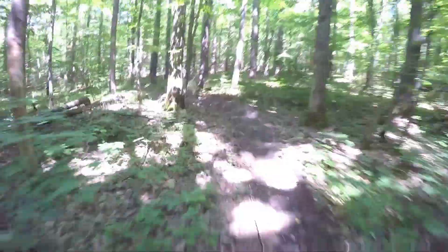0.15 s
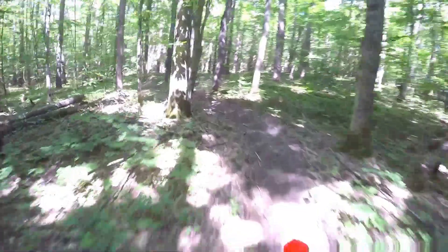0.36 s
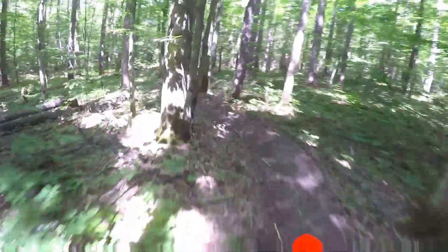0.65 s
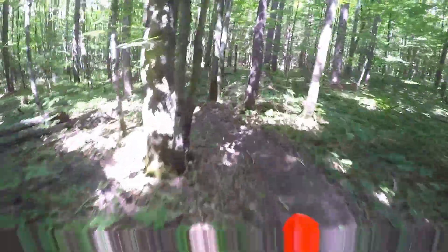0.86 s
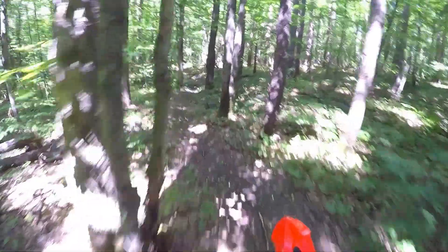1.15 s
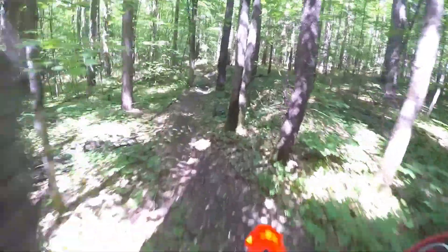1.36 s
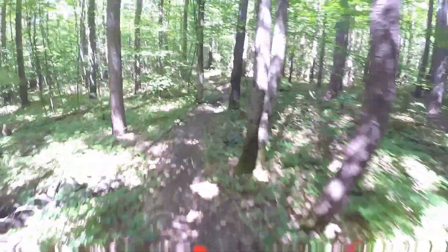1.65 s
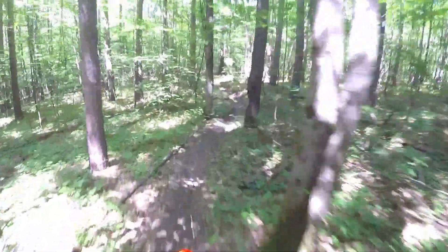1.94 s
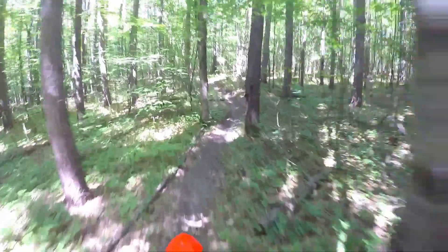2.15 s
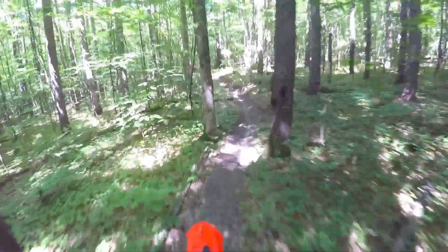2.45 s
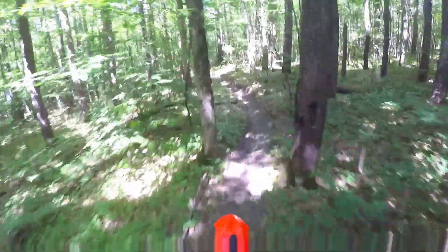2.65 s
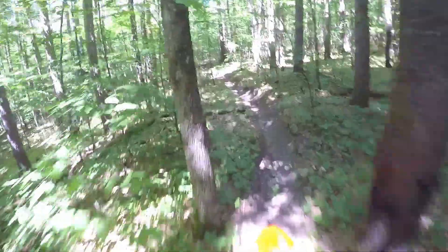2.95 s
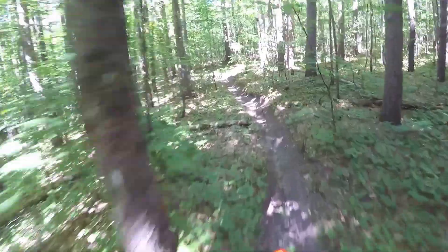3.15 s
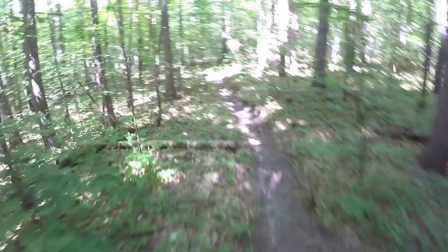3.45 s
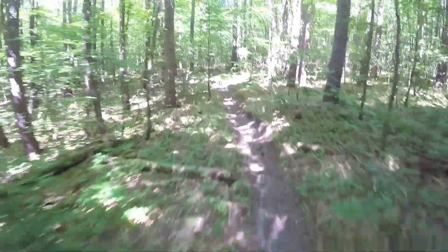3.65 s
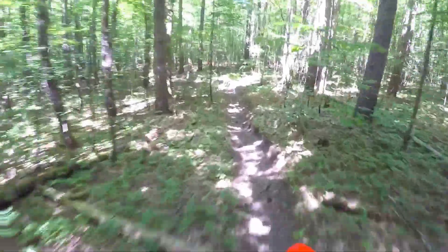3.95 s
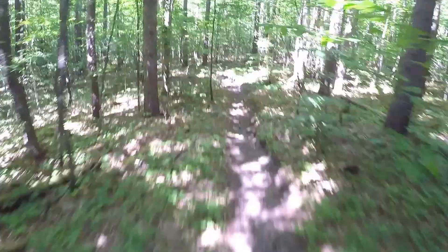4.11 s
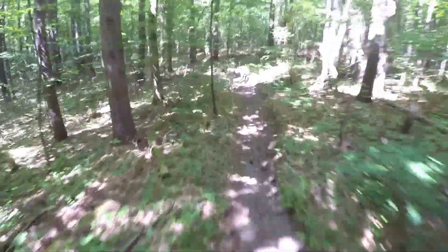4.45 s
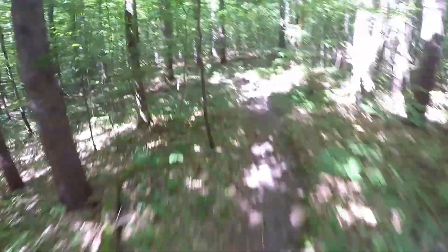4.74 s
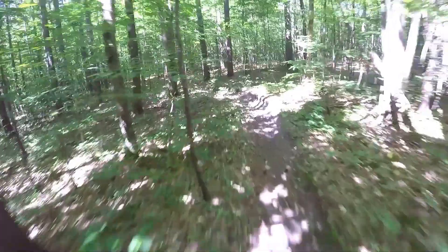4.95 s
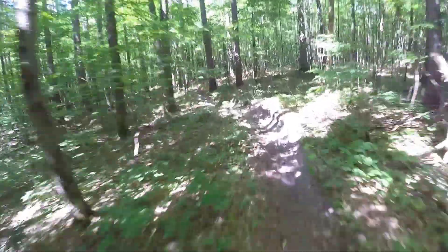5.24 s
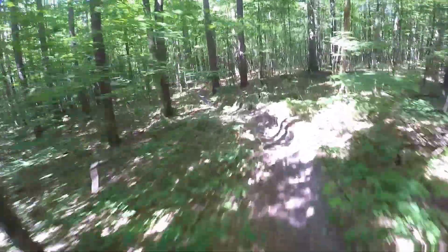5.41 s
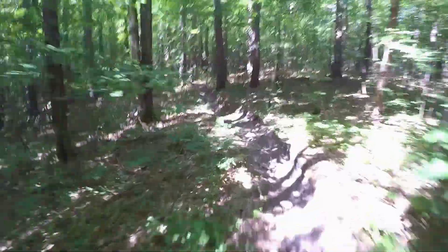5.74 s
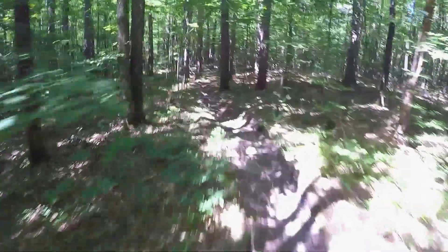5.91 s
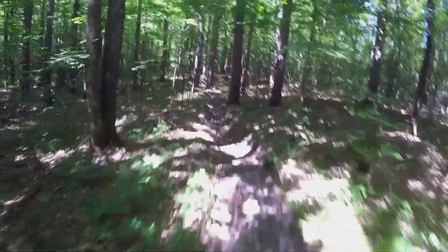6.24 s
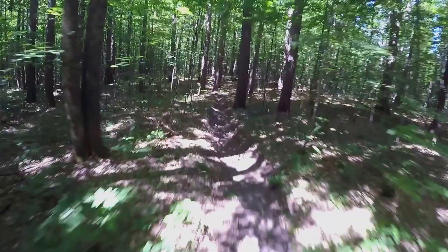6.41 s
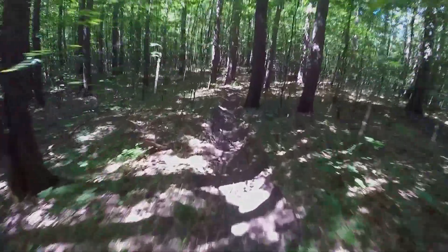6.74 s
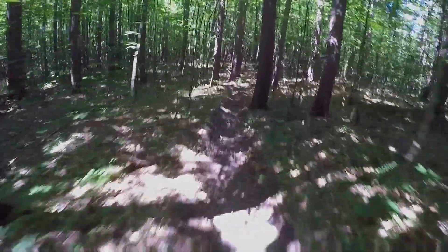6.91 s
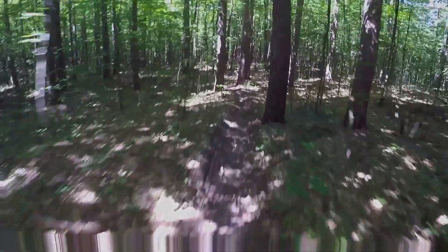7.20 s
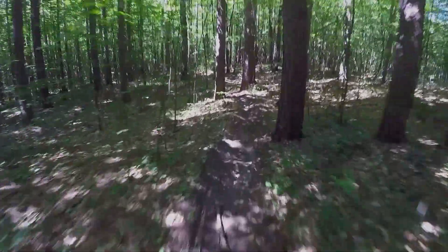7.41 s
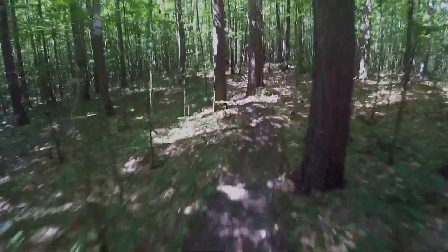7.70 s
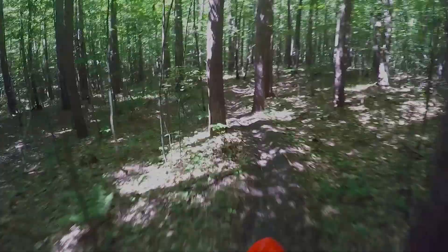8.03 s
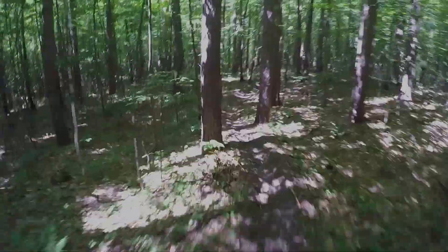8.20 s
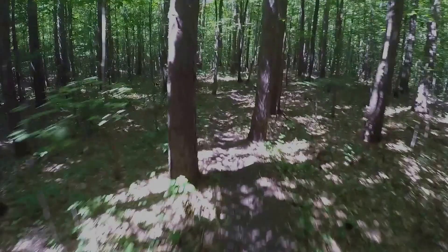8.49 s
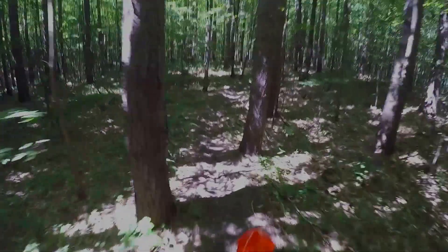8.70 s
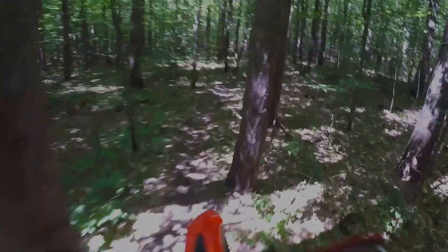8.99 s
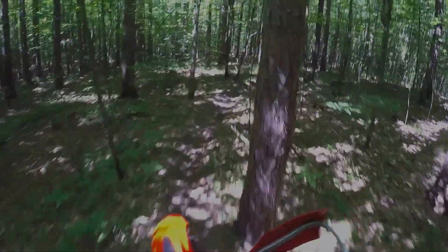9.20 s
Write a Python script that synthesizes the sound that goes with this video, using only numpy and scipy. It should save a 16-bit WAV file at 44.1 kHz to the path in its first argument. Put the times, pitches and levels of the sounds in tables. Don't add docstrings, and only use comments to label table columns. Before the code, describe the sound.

Heard from a camera on the rider's helmet outdoors: tyre rumble, lumpy wind buffeting and a fast low engine hum that wavers over bumps. The two-stroke burbles, then fires in three ringing bursts in the first half, the second and third loudest. Off throttle it purrs, clatters and pops irregularly. Later, hard little ticks and swishing foliage strike the casing before the engine slows.

```python
import sys
import numpy as np
from scipy import signal
from scipy.fft import rfft, irfft, next_fast_len
from scipy.io import wavfile
from scipy.ndimage import uniform_filter1d, map_coordinates

SR = 44100
rng = np.random.default_rng(int(sys.argv[2]) if len(sys.argv) > 2 else 0)


def makeup_ratio(level_db):
    decades = np.asarray(level_db, float) / 20
    return 10 ** decades


def transcribe(signal):
    frames = np.atleast_2d(signal).T
    limited = np.clip(frames, -1, 1)
    pcm = np.round(limited * 32767).astype(np.int16)
    wavfile.write(sys.argv[1], SR, pcm)


N = 412776
T = np.arange(N) / SR

# time in seconds, firings in Hz, exhaust level in dB, pipe note in Hz.
BURSTS = [
    [(1.625, 37.8, -19, 273), (1.655, 39.25, -18.5, 286), (1.791, 42.75, -17, 283),
     (1.937, 45.03, -18, 299), (1.991, 47.4, -20, 310), (2.021, 47.32, -29.5, 307), (2.1, 44.3, -30.5, 288)],
    [(3.196, 41.6, -15.5, 269), (3.258, 43, -16.5, 284), (3.364, 45.38, -13, 294.5),
     (3.48, 52.1, -11.5, 283), (3.554, 52.3, -12.5, 280.3), (3.612, 52.73, -13, 287),
     (3.682, 57.53, -10.5, 291), (3.725, 58.4, -22, 286)],
    [(4.5055, 54.6, -14, 304), (4.53, 55.35, -11, 309.4), (4.572, 56.5, -11, 308),
     (4.63, 54.53, -16, 309.8), (4.684, 56.4, -13, 295.5), (4.715, 56.3, -21, 279.7)],
]


def unit(x):
    return x / np.sqrt(np.mean(x ** 2) + 1e-20)


def curves(rows):
    s, *cols = np.transpose(rows)
    return [np.interp(T, s, c) for c in cols]


def along(points, hz):
    f, db = np.transpose(points)
    return np.interp(np.log(hz + 1), np.log(f), db)


def humps(rows):
    return sum(height * np.exp(-((T - s) / half) ** 2) for s, height, half in rows)


def wobble(rate, times=T):
    return map_coordinates(rng.standard_normal(int(N * rate / SR) + 4), [times * rate])


def follows(strain_db, load, base_db, slope, load_db, power):
    return makeup_ratio(base_db + slope * (strain_db + 46.5)) + makeup_ratio(load_db) * load ** power


def filtered(x, response):
    m = next_fast_len(N + SR // 2)
    return irfft(rfft(x, m) * response(np.fft.rfftfreq(m, 1 / SR)), m)[:N]


def mode(f, hz, width, db):
    return makeup_ratio(db) * 1j * f * width / (hz * hz - f * f + 1j * f * width)


def in_row(x, modes):
    response = lambda f: np.prod([mode(f, *m) for m in modes], axis=0)
    return filtered(x, response) / np.max(np.abs(filtered(T == 0, response)))


def side_by_side(x, modes):
    return filtered(x, lambda f: sum((-1) ** k * mode(f, *m) for k, m in enumerate(modes)))


def patchy(depth_db):
    z = signal.stft(rng.standard_normal(N), nperseg=512)[2]
    field = uniform_filter1d(rng.standard_normal(z.shape), size=3, axis=0)
    field = uniform_filter1d(field, size=7, axis=1)
    return unit(signal.istft(z * makeup_ratio(depth_db * unit(field)), nperseg=512)[1][:N])


def noise(spectrum, depth_db):
    return unit(filtered(patchy(depth_db), lambda hz: makeup_ratio(along(spectrum, hz))))


def firings(speed, start, stop, jitter):
    a, b = round(start * SR), min(round(stop * SR), N)
    turn_count = np.floor(np.cumsum(speed[a:b]) / SR)
    at = a + np.flatnonzero(np.diff(turn_count, prepend=-1))
    late = np.round(jitter * SR * rng.standard_normal(len(at))).astype(int)
    return np.clip(at + late, 0, N - 1)


def add(out, at, size, hz, rise):
    t = np.arange(SR // 16) / SR
    rise = 1.22 * np.clip(rise, .001, .012)
    u = t / rise[:, None]
    swell = (u * np.exp(1 - u)) ** 3
    wave = -size[:, None] * swell * np.sin(2 * np.pi * hz[:, None] * (t - rise[:, None]))
    start = at + np.round((.004 - rise) * SR).astype(int)
    out += np.bincount((start[:, None] + np.arange(len(t))).ravel(), wave.ravel(), N + SR)[:N]


def crank(turns, hum_db, load):
    # time in seconds, loss in dB, half
    # length in seconds.
    hum_dips = [(0, 25, 0.13), (1.82, 16, 0.053), (2.02, 26, 0.094), (3.06, 8, 0.032), (3.55, 6, 0.095),
                (4.25, 6.5, 0.11), (4.82, 16, 0.067), (5.16, 11, 0.035), (5.37, 10, 0.044), (5.93, 39, 0.052),
                (6.24, 20, 0.064), (6.96, 8, 0.06), (7.51, 4.5, 0.17), (8.29, 22, 0.054), (8.6, 7, 0.047)]
    # multiple of the turn rate, level in dB.
    loaded_orders = [(2, -21), (3, -38), (4, -32), (5, -27.5)]
    hum_db = hum_db - humps(hum_dips)
    first = makeup_ratio(hum_db + 1.8 * wobble(14)) * np.sin(2 * np.pi * turns + .4 * wobble(9))
    more = sum(makeup_ratio(db + 1.4 * wobble(11)) * np.sin(2 * np.pi * round(k) * turns + 0.58 * wobble(8))
               for k, db in loaded_orders)
    return np.sqrt(2) * (first + load ** .6 * more)


def coasting(speed, turns):
    # time in seconds, level in dB, extra brightness in dB per octave over the pipe note.
    pumping = [(0, -25, 1), (.3, -30, -0.5), (.55, -29.5, -0.5), (.94, -27.5, -5), (1.4, -31, 2),
               (2.27, -31, -1), (3.05, -29.5, 1.5), (4.04, -28.5, 0), (4.9, -30, 1.5), (5.4, -32, 4.5),
               (5.9, -30, 2.5), (6.39, -30.5, 3), (6.8, -30, 2), (7.51, -33, -2.5), (8.1, -34, 0.5),
               (8.45, -30, -14), (8.9, -33.5, -6), (9.36, -34.5, -13)]
    # frequency in Hz, level in dB.
    cool_pipe = [(90, 3.5), (150, -8.5), (290, 0), (370, -5), (440, -18), (510, -2), (590, -8), (800, -30)]
    coast_db, tilt = curves(pumping)
    step = slice(None, None, 16)
    speed, turns, times = speed[step], turns[step], T[step]
    brightness = 0.59 * (speed - 50) + tilt[step]
    purr = np.zeros(len(times))
    for k in range(2, 19):
        octaves = np.log2(np.maximum(k * speed / 270, 1))
        level_db = along(cool_pipe, k * speed) + brightness * octaves + 2.6 * wobble(10, times)
        drift = (.24 + .04 * k) * wobble(10, times) + .027 * k * wobble(32, times)
        purr += makeup_ratio(level_db) * np.sin(2 * np.pi * k * turns + drift + rng.uniform(0, 2.5))
    purr = signal.resample_poly(purr, 16, 1)[:N]
    return makeup_ratio(coast_db + 1.55 * wobble(6) - 6.0) * unit(purr)


def clatter(speed, turns, strain_db, shake, blows):
    # frequency in Hz, width in Hz, level in dB.
    low_case = [(949, 83, 1), (1314, 165, -6.5), (1650, 240, -16.5)]
    thin_walls = [(2436, 195, 2.5), (2746, 249, 1), (3896, 280, -12.5), (4650, 510, -15), (5540, 790, -19),
                  (6570, 140, -21.5), (8040, 380, -22.5)]
    low_gain = follows(strain_db, shake, base_db=-47, slope=0.72, load_db=-24, power=2) + makeup_ratio(-42) * blows
    high_gain = follows(strain_db, shake, base_db=-48, slope=0.26, load_db=-42.5, power=0.67)
    high_gain = high_gain + makeup_ratio(-35.5) * blows
    slaps = np.zeros(N)
    at = firings(speed, .008, N / SR, jitter=.00012)
    slaps[at] = makeup_ratio(1.7 * rng.standard_normal(len(at)))
    slaps = unit(slaps)
    beat = 1 + .2 * np.cos(2 * np.pi * turns - 2.4)
    gear_level = beat * makeup_ratio(.9 * wobble(60) + .6 * wobble(7))
    low = side_by_side(gear_level * patchy(depth_db=.8) + .5 * slaps, low_case)
    high = side_by_side(gear_level * patchy(depth_db=.9) + .22 * slaps, thin_walls)
    return makeup_ratio(0.5) * (low_gain * unit(low) + high_gain * unit(high))


def wind(strain_db, load):
    # time in seconds, peak in dB, half length in seconds.
    gust_times = [(0, -28, 0.29), (1.795, -19.5, 0.1), (2.436, -34, 0.08), (3.022, -24, 0.088),
                  (3.358, -34, 0.17), (3.784, -30, 0.092), (4.173, -23, 0.037), (4.389, -23.5, 0.15),
                  (4.732, -16, 0.075), (4.812, -32, 0.034), (5.058, -36, 0.1405), (5.816, -31, 0.082),
                  (6.162, -25, 0.045), (6.41, -23, 0.096), (7.08, -31, 0.07), (7.46, -31, 0.061),
                  (7.694, -29.5, .15), (8.49, -20, 0.064), (9.36, -36, .15)]
    # frequency in Hz, level in dB per Hz.
    gust_colour = [(8, -25), (16, -1), (30, -1), (40, -5.5), (70, -17), (200, -86)]
    tyre_colour = [(25, -32), (55, 4.5), (110, -5), (170, -12.5), (300, -14), (560, -19), (800, -30),
                   (1500, -71)]
    gusts = humps([(s, makeup_ratio(db), half) for s, db, half in gust_times])
    buffet = unit(makeup_ratio(1.2 * wobble(5)) * noise(gust_colour, depth_db=1))
    tyres = unit(makeup_ratio(1.77 * wobble(8)) * noise(tyre_colour, depth_db=1.0))
    roll = follows(strain_db, load, base_db=-34.5, slope=.5, load_db=-18.5, power=1.3) + makeup_ratio(-29.0) * gusts
    rush = follows(strain_db, load, base_db=-55.5, slope=0.69, load_db=-48.5, power=0.45)
    rush = rush * makeup_ratio(.9 * wobble(4) + 0.79 * wobble(11))
    calm = makeup_ratio(-34)
    return (calm + gusts) * buffet + makeup_ratio(3) * roll * tyres, rush


def hiss(turns, jet, rush):
    # frequency in Hz, level in dB per Hz.
    jet_colour = [(1500, 4), (3300, 0.5), (6000, -2.5), (9000, -7), (12000, -7.5), (15300, -10.5)]
    # frequency in Hz, change in dB.
    air_change = [(1500, -1.5), (6000, 2.35), (10000, -2.5), (15300, -4.5)]
    spit = (1 + .4 * np.cos(2 * np.pi * turns)) * makeup_ratio(1.5 * wobble(90))
    air = noise(jet_colour, depth_db=3.0)
    dull_air = filtered(air[::-1], lambda hz: makeup_ratio(along(air_change, hz)))
    return jet * spit * air + rush * makeup_ratio(1.7 * wobble(40)) * dull_air


def whine():
    return makeup_ratio(-80 + 2.4 * wobble(3.2)) * np.sin(2 * np.pi * 10405 * T + wobble(9))


def buzzes():
    # time in seconds, note in Hz, level in dB, length in seconds.
    loose_parts = [(1.3, 1740, -53, 0.12), (2.754, 1640, -49.5, 0.038), (3.251, 1527, -47.5, 0.032),
                   (4.058, 1697, -48, 0.073), (5.506, 1735, -54, 0.065), (5.699, 1650, -50, 0.049),
                   (6.299, 5215, -59, 0.05), (6.22, 4800, -59, .03), (7.053, 5073, -58, 0.03),
                   (7.134, 4600, -50, 0.013), (7.148, 5500, -54, .02), (0.404, 4600, -60, 0.37)]
    out = np.zeros(N)
    around = np.arange(-SR // 2, SR // 2)
    t = around / SR
    for s, hz, db, length in loose_parts:
        shake = uniform_filter1d(rng.standard_normal((2, len(t))), size=90)
        note = unit(shake[0] * np.sin(2 * np.pi * hz * t) + shake[1] * np.cos(2 * np.pi * hz * t))
        at = np.clip(round(s * SR) + around, 0, N - 1)
        out[at] += makeup_ratio(db) * np.exp(-(t / length) ** 2) * note
    return out


def ticks():
    # start in seconds, peak in dB, knock in dB, brightness in dB, time to fall 60 dB in seconds.
    hits = [(0.864, -38, 9, -1, 0.0088), (1.0908, -44, -4, -18, 0.007), (1.223, -39, 2, -17, 0.0079),
            (2.5436, -34, -7, -14, 0.01), (5.2305, -16.5, -22, -6.5, 0.0036),
            (5.897, -51, 22.5, -16.5, 0.0083), (7.5186, -36, 5, -9, 0.0078), (7.5458, -21, -1, -9, 0.025),
            (7.605, -33, -16, -1, 0.012), (7.6575, -36, -14, -3, 0.02), (7.9504, -40, -14, -6, .015),
            (6.1735, -42, -14, -8, .015), (7.1223, -42, -14, -11, .015), (7.8343, -26.5, 9, -22, 0.03),
            (7.8403, -30, -7, -23, 0.0098)]
    # frequency in Hz, width in Hz, level in dB.
    lid = [(2260, 380, -1.5), (2849, 340, -2), (1470, 440, -6)]
    snap = [(6540, 1800, 6), (9800, 1900, 1), (13300, 1800, -6)]
    body, bright, knock = np.zeros((3, N))
    t = np.arange(SR // 20) / SR
    for s, db, knock_db, bright_db, t60 in hits:
        at = round(s * SR)
        crack = makeup_ratio(db - 60 * t / t60) * rng.standard_normal(len(t))
        crack[0] = 9 * makeup_ratio(db) * min(1, 0.0069 / t60) ** .5
        body[at:][:len(t)] += makeup_ratio(1.0) * crack
        bright[at:][:len(t)] += makeup_ratio(bright_db - 7.0 - 60 * t / 0.024) * crack
        knock[at] = makeup_ratio(db + knock_db)
    ring = sum(makeup_ratio(db) * in_row(body, [(hz, width, 0), (hz, 2.4 * width, 0)]) for hz, width, db in lid)
    twig = filtered(side_by_side(bright, snap), lambda f: mode(f, 10500, 11000, 0))
    frame = in_row(knock, [(340.15, 159.4, 0), (338.0, 350, 0)])
    return makeup_ratio(-22.0) * ring + makeup_ratio(2.0) * twig - frame


def stray_pops(pipe, jet):
    # time in seconds, peak in dB, gas hiss in dB, overtone in dB.
    cracks = [(1.098, -28, -46, -9), (1.128, -24, -67, -13), (1.618, -26, -46, 2), (3.216, -42, -54, -11),
              (7.217, -29, -48, -8), (8.675, -35, -55, -9), (9.109, -39, -56, -11), (1.176, -24, -47, -11),
              (1.29, -22.5, -42.5, -18), (1.427, -28, -48.5, -12), (1.572, -15, -46, -17),
              (2.138, -38, -41.5, -6), (2.286, -40, -45.5, -11), (2.448, -31, -47, -8),
              (3.033, -14.5, -44.5, -10), (3.122, -14, -43, -6), (3.171, -8.5, -43.5, -13),
              (3.741, -10.5, -46, -9), (3.909, -25, -44, -20), (4.061, -17, -40, -11),
              (4.282, -19.5, -49, -7), (4.339, -8, -42, -10), (4.384, -19, -43, -7), (4.483, 0, -47, -11.5),
              (4.72, -7.5, -39, -11), (6.176, -10.5, -46.5, -11), (6.304, -20.5, -54, -7),
              (6.42, -27, -50, -12), (6.964, -17.5, -48, -8), (7.05, -13.5, -50, -13.5),
              (7.148, -36, -58, -9), (7.133, -19.5, -50, -4), (7.656, -39, -41, -12),
              (7.97, -30, -45.5, -13), (9.03, -30, -45.5, -17), (9.175, -34, -46.5, -20),
              (9.324, -27, -43.5, -17)]
    # time in seconds, peak in dB.
    thuds = [(1.332, -33), (1.4, -22.5), (1.458, -25), (1.487, -23.5), (1.513, -33), (1.543, -19),
             (1.599, -15), (3.062, -14), (3.099, -11.5), (3.147, -13), (3.777, -17.5), (4.003, -18.5),
             (4.023, -23), (4.301, -15), (4.321, -18), (4.363, -17.5), (4.461, -10.5), (6.158, -22),
             (6.199, -18), (6.222, -15), (6.245, -26), (6.265, -27), (6.989, -24), (7.012, -21),
             (7.031, -19), (7.076, -27), (7.096, -28), (7.116, -21)]
    thud_hiss_db, thud_overtone_db = -71, -17.5
    pops = list(cracks) + [(s, db, thud_hiss_db, thud_overtone_db) for s, db in thuds]
    s, db, hiss_db, over_db = np.transpose(pops)
    at = np.round(s * SR).astype(int)
    chance = rng.standard_normal((4, len(s)))
    add(pipe, at, makeup_ratio(db - 0.5), 285 * (1 + 0.048 * chance[0]), 0.0047 * (1 + .07 * chance[2]))
    over_level = makeup_ratio(db + over_db - 0.087 * (db + 3.0) + 2 * chance[3])
    add(pipe, at, over_level, 525 * (1 + 0.029 * chance[1]), np.full(len(s), .0036))
    u = np.arange(SR // 8) / SR / 0.017
    swell = (u * np.exp(1 - u)) ** 2
    crisp_spit = 0.8 * (u > 2 / 3) * np.exp(7.5 * (2 / 3 - u))
    for start, puff_db in zip(s, hiss_db):
        begin = round((start - .012) * SR)
        puff = makeup_ratio(puff_db - 4.0) * (swell + crisp_spit)
        jet[begin:][:len(u)] += puff[:N - begin]


def throttle_bursts(pipe, jet):
    # time in seconds, note in Hz.
    far_cone = [(1.62, 500), (1.75, 550), (1.9, 570), (2.05, 560), (3.2, 517), (3.4, 575), (3.5, 495),
                (3.6, 493.5), (3.7, 538), (4.5, 584.2), (4.6, 580), (4.71, 529)]
    overtone_hz = curves(far_cone)[0]
    cold_overtone_db, hot_overtone_db, warm_up_s = [-11, -19.5, -18], -13, 0.51
    echo_delay = round(0.00703 * SR)
    load = np.zeros(N)
    for rows, cold_db in zip(BURSTS, cold_overtone_db):
        start, stop = rows[0][0], rows[-1][0]
        speed, level_db, hz = curves(rows)
        at = firings(speed, start, stop, jitter=0.00012)
        chance = rng.standard_normal((4, len(at)))
        warm = np.clip((T[at] - start) / warm_up_s, 0, 1)
        tuned = np.exp(-((speed[at] - 43.3) / 3.16) ** 2)
        rise = (.005 + 0.0066 * tuned) * makeup_ratio(1.2 * chance[3])
        add(pipe, at, makeup_ratio(level_db[at] + 5.5 + 0.24 * chance[0]), hz[at], rise)
        over_db = cold_db + (hot_overtone_db - cold_db) * warm - 5.5 * tuned
        over_level = makeup_ratio(level_db[at] + over_db + 8.5 + 1.6 * chance[1])
        over_hz = overtone_hz[at] * (1 + .022 * chance[2])
        add(pipe, at + echo_delay, over_level, over_hz, 0.0035 + 0.0018 * tuned)
        throttle = (T > start) & (T < stop)
        load += throttle * makeup_ratio(level_db)
        jet += throttle * makeup_ratio(-52 + 0.12 * (level_db + 6) + 1.2 * wobble(13))
    return np.abs(uniform_filter1d(load, size=900))


def brushes():
    # time in seconds, level in dB, half length in seconds.
    swishes = [
        (7.521, -59, .008),
        (7.55, -46, 0.024),
        (7.668, -39, 0.009),
        (7.684, -41.5, 0.014),
        (7.839, -49, 0.011),
    ]
    # frequency in Hz, width in Hz, level in dB.
    leaves = [(2686, 250, 6.5), (4987, 370, 0.5), (5830, 400, -1.5), (6910, 500, -7.5), (8110, 600, -7.5),
              (9480, 900, -13)]
    grit = makeup_ratio(2.9 * wobble(150) + 3.47 * wobble(900)) * rng.standard_normal(N)
    return humps([(s, makeup_ratio(db), half) for s, db, half in swishes]) * unit(side_by_side(grit, leaves))


def scene():
    # time in seconds, crank turns in Hz, crank hum in dB, mechanical strain in dB.
    off_throttle = [(0, 56.3, -23, -43.5), (0.208, 51.73, -24, -41.5), (.42, 56.07, -25.5, -42.5),
                    (.94, 44.75, -21.5, -44.5), (1.169, 38.28, -20.5, -46.5), (1.54, 36.57, -19.5, -46.5),
                    (2.269, 41.77, -20.5, -45), (3.049, 36.48, -22.5, -47.5), (4.041, 48.9, -21.5, -42.5),
                    (4.82, 57.53, -30, -42), (5.05, 51.52, -21.5, -43), (5.658, 49.68, -24.5, -43),
                    (6.13, 47.34, -19, -46.5), (6.39, 49.78, -24, -42.5), (6.9, 47, -28, -46.5),
                    (7.14, 48.5, -22, -43.5), (8.02, 47.6, -26.5, -47), (9.36, 33.3, -27.5, -56.5)]
    # time in
    # seconds, crank turns in Hz.
    speed_points = [(.098, 53.1), (.302, 54.3), (.566, 53.7), (1.06, 41), (1.274, 40.4), (1.362, 40.5),
                    (2.466, 42.1), (2.75, 38.9), (2.962, 39.2), (5.19, 52.3), (5.42, 51.6), (5.75, 51),
                    (6.02, 48.8), (6.26, 49.1), (6.53, 48.2), (6.63, 48.8), (6.82, 46.7), (7.4, 47.9), (7.49, 48.6),
                    (7.8, 47.2), (7.9, 48.3), (8.56, 40.5), (8.88, 39.5), (9.04, 36.5)]
    pipe, jet = np.zeros((2, N))
    stray_pops(pipe, jet)
    load = throttle_bursts(pipe, jet)
    speed, = curves(sorted(row[:2] for row in off_throttle + speed_points + sum(BURSTS, [])))
    speed = speed * (1 + .005 * wobble(5) * np.exp(-40 * load))
    turns = np.cumsum(speed) / SR
    _, hum_db, strain_db = curves(off_throttle)
    shake = np.abs(uniform_filter1d(load, size=5000, origin=800))
    blows = np.abs(uniform_filter1d(np.abs(pipe), size=160)) ** 0.75
    pipe = filtered(pipe + coasting(speed, turns), lambda f: 1 - mode(f, hz=452, width=34, db=-2.1))
    rumble, rush = wind(strain_db, shake)
    engine = crank(turns, hum_db, load) + pipe + clatter(speed, turns, strain_db, shake, blows)
    air = rumble + hiss(turns, jet, rush)
    return (engine + air + ticks() + brushes() + buzzes() + whine())[None]


def roll_off(x):
    return signal.sosfilt(signal.butter(12, 15380, fs=SR, output="sos"), x)


def record(dry):
    held = dry[0] / (1 + np.abs(dry[0] / .95) ** 8) ** (1 / 8)
    mix = filtered(held, lambda hz: hz < 15380)[None]
    return roll_off(mix)


dry = scene()
out = record(dry)
transcribe(out)
```